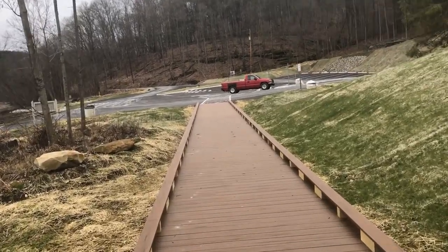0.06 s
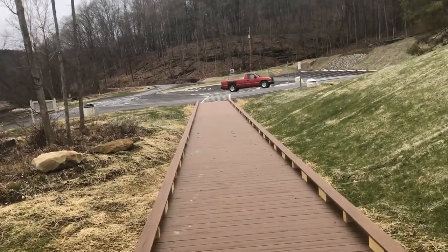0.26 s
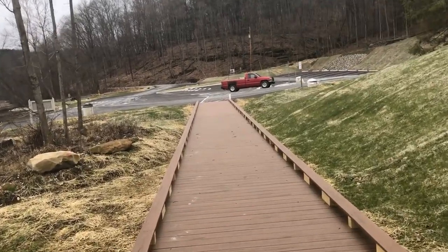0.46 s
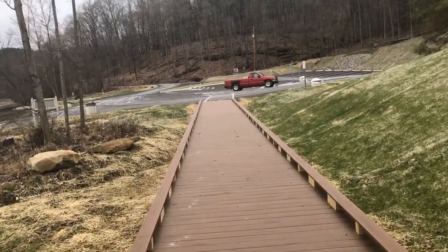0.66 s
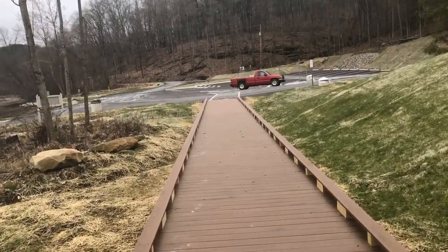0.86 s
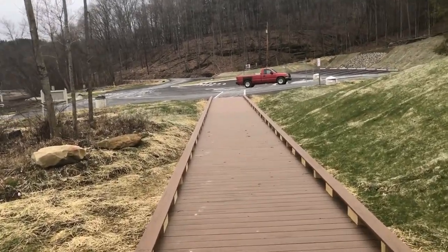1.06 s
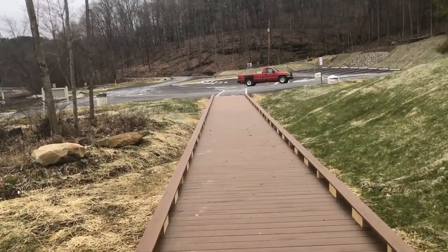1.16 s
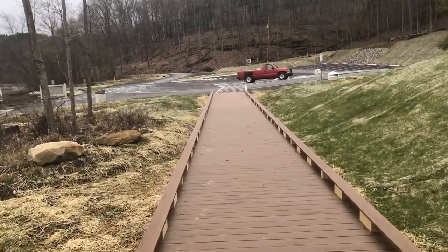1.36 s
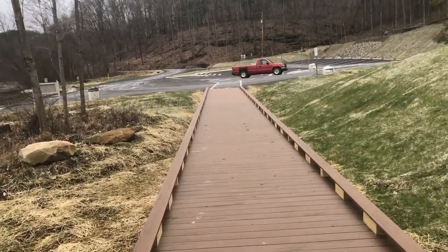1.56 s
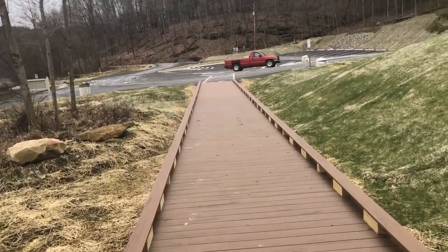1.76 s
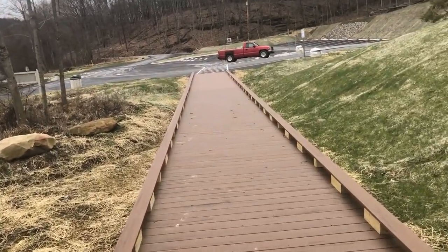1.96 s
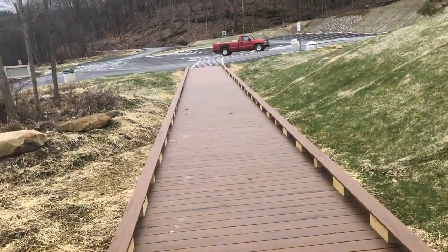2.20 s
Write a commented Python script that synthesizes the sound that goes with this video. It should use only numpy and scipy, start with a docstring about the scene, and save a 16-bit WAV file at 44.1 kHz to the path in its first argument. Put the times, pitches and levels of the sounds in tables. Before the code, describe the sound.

One walker treads a plank deck outdoors, each step a dull woody thud with rattling knocks; soles scrape and ribbed clothing swishes between steps, a sharper clack comes near the end; heard from the walker's position, no echo.

```python
"""Someone walks at an even pace along a raised boardwalk in open country, over a faint outdoor hush.
From the first step heel and sole strike the deck's modes, and planks knock as falling chirps of bending waves.
Between steps soles scuff as grainy friction noise, and ribbed clothing brushes with short zips of weave ticks.
Late on, after the last zip, one heel lands with a hard clack: a noise crack and short bright modes."""
import sys
import numpy as np
from scipy import signal
from scipy.fft import rfft, irfft
from scipy.io import wavfile

SR = 44100
rng = np.random.default_rng(int(sys.argv[2]) if len(sys.argv) > 2 else 0)


def master(y):
    """Save y as 16-bit WAV."""
    cut = np.clip(np.atleast_2d(y).T, -1, 1)
    pcm = np.round(cut * 32767)  # scale
    wavfile.write(sys.argv[1], SR, pcm.astype(np.int16))


N = 98387
T = np.arange(N) / SR
FREQS = np.maximum(np.arange(N // 2 + 1) * SR / N, 1)


def from_db(db):
    """Logarithmic level: 20 dB is a tenfold amplitude gain."""
    return 10 ** (np.asarray(db) / 20)


def rms_one(x):
    """Power normalization: scale to a mean square of one."""
    return x / np.sqrt(np.mean(x ** 2) + 1e-20)


def noise(spectrum, tilt_db=0, extra_db=0):
    """Spectral shaping: unit-power noise filtered to a spectrum, tilted by dB per octave."""
    hz, db = np.transpose(spectrum)
    octaves = np.log2(FREQS / hz[0])
    shape_db = np.interp(np.log(FREQS), np.log(hz), db) + tilt_db * octaves + extra_db
    skirt = np.minimum(FREQS / hz[0], 1) ** 4  # steep fall below the first frequency
    white = rfft(rng.standard_normal(N))
    return rms_one(irfft(white * from_db(shape_db) * skirt, N))


def flutter(rate_hz):
    """Random modulation: low-passed noise wobbles smoothly, with unit power."""
    white = rfft(rng.standard_normal(N))
    return rms_one(irfft(white / (1 + (FREQS / rate_hz) ** 2), N))


def decay(start, t60):
    """Exponential decay: the envelope jumps to 1 and falls 60 dB in t60 seconds."""
    elapsed = np.clip((T - start) / t60, 0, 2)
    return (T >= start) * np.exp(-np.log(1000) * elapsed)


def ring(times, gains, hz, t60):
    """Modal resonance: a damped two-pole oscillator struck by impulses at the given times."""
    clicks = np.zeros(N)
    samples = np.clip((times * SR).astype(int), 0, N - 1)
    np.add.at(clicks, samples, gains)
    radius = np.exp(-np.log(1000) / (t60 * SR))
    angle = 2 * np.pi * hz / SR
    poles = [1, -2 * radius * np.cos(angle), radius * radius]
    return signal.lfilter([0, np.sin(angle)], poles, clicks + 1e-18)


# Heel, sole and weight coming down on the deck.
# Each row: start in seconds, relative level in dB, bass in dB, treble in dB.
FOOTFALLS = [(0.001, -37.5, -36, -8.5), (0.074, -47.5, -19, 11), (0.088, -55, -10, 12),
             (0.134, -60.5, 9, -8), (0.188, -56.5, -2, 2), (0.594, -50, 9.5, -1), (0.623, -46, -23, -10),
             (0.656, -57, -3, 8.5), (0.724, -61, 14, -31), (0.834, -54.5, -2, -3), (0.995, -63, -1, 11),
             (1.171, -57, -6, 2), (1.231, -45.5, -8, 4.5), (1.263, -43.5, -6, -5.5), (1.292, -54.5, -4, -6),
             (1.328, -56.5, 11, -13), (1.454, -60, -12, 3.5), (1.768, -47, 13, -0.5),
             (1.815, -46.5, -17, 10), (1.838, -49, -4, 2.5), (1.861, -47, -13, 5), (1.924, -51, -12, 4.5),
             (2.044, -55, -16, 5.5)]
# Modes of the deck on its joists. Each row: frequency in Hz, relative level in dB, t60 in seconds.
DECK_MODES = [(44, -21.5, 0.19), (78.5, -9, 0.48), (118.1, -3, 0.42), (139, -24, 0.087), (155.4, -2, 0.21),
              (192.3, 4.5, 0.19), (241.3, -3, 0.15), (257, -14, 0.11), (311.3, -2.5, 0.13),
              (334.4, -13.5, 0.29), (393, -16.5, 0.14), (449, -19, 0.15), (601, -39, 0.11),
              (692, -15, 0.077), (920, -23, 0.06)]
BASS_HZ, BODY_HZ, TREBLE_HZ = 80.5, 186, 319
MODE_SCATTER_DB = 0.6
DECK_TRAVEL_S = 0.0029  # at the body pitch; lower modes arrive later


def deck_modes():
    """Modal excitation: each footfall rings the deck in a balance that depends on the spot."""
    start, db, bass_db, treble_db = np.transpose(FOOTFALLS)
    scatter_db = MODE_SCATTER_DB * rng.standard_normal((len(start), len(DECK_MODES)))
    out = np.zeros(N)
    for k, (hz, mode_db, t60) in enumerate(DECK_MODES):
        low = np.interp(hz, [BASS_HZ, BODY_HZ], [1, 0])
        high = np.interp(hz, [BODY_HZ, TREBLE_HZ], [0, 1])
        gains = from_db(db + mode_db + low * bass_db + high * treble_db + scatter_db[:, k])
        arrival = start + DECK_TRAVEL_S * (np.sqrt(BODY_HZ / hz) - 1)
        sign = (-1) ** (k // 2)  # polarity flips every two modes
        out += sign * ring(arrival, gains, hz, t60)
    return out


# The rest of the structure. Each row: frequency in Hz, relative spectral level in dB per Hz.
RUMBLE = [(25, -3), (45, -15), (80, -9.5), (160, 6.5), (300, -16.5), (500, -18.5), (900, -28),
          (1600, -25.5), (4000, -51)]
RUMBLE_DB, RUMBLE_T60_S, RUMBLE_RISE_S = -4.5, 0.5, 0.0086


def deck_rumble():
    """Diffuse decay: the structure rumbles on as noise, the powers of the footfalls adding."""
    power = np.zeros(N)
    for start, db, _, _ in FOOTFALLS:
        rise = np.clip((T - start) / RUMBLE_RISE_S, 0, 1)
        power += (from_db(db) * decay(start, RUMBLE_T60_S) * rise) ** 2
    return from_db(RUMBLE_DB) * np.sqrt(power) * noise(RUMBLE)


# Planks knocking on their joists. Each row: start in seconds, relative level in dB,
# brightness in dB per octave, travel time at 1 kHz in seconds.
KNOCKS = [(0.0683, -45, -7, .0036), (0.0845, -44, 7, .003), (0.118, -48, 5, .003),
          (0.146, -44, -11, 0.0039), (0.27, -43.5, -6.5, 0.0022), (0.291, -44, -7, .003),
          (0.361, -44.5, -3, 0.0033), (0.372, -41, -5, .0045), (0.507, -57, 13, .003),
          (0.592, -55, -3, 0.0042), (0.619, -38.5, -8, .003), (0.666, -45.5, -2.5, .003),
          (0.811, -42.5, -9, .003), (0.922, -45.5, -2, 0.0027), (0.998, -43, -1, .003),
          (1.018, -42, -7.5, .003), (1.053, -41.5, -9, .0036), (1.129, -44, -3.5, .003),
          (1.228, -41.5, -7.5, .003), (1.262, -50, -1, .003), (1.305, -50, -10, .003),
          (1.347, -45.5, -8, .003), (1.381, -43.5, -9.5, 0.0035), (1.451, -44, -3, 0.00341),
          (1.566, -46.5, 2.5, .003), (1.659, -37, -1, .003), (1.665, -42.5, -12.5, .0036),
          (1.767, -43.5, 3, 0.0034), (1.781, -40.5, 2, .0035), (1.799, -38.5, -2, .003),
          (1.813, -37.5, 1, .003), (1.868, -41.5, 1.5, .003), (1.911, -44, 3, .003),
          (2.050, -38.5, -4.5, .003), (2.172, -40, 1, .003)]
KNOCK_HZ, KNOCK_OCTAVES, KNOCK_DB = 530, 1.015, -3  # centre, width, level
KNOCK_ECHO_DB, KNOCK_ECHO_PATH = -9, 2.1  # back from the plank's end; length against the direct path


def knock_chirps():
    """Bending-wave dispersion: highs travel faster, so each knock is a quick falling chirp."""
    out = np.zeros(N)
    hz = np.maximum(np.arange(2049) * SR / 4096, 1)
    octave = np.log2(hz / KNOCK_HZ)
    for s, db, tilt_db, travel in KNOCKS:
        shape = np.exp(-.5 * (octave / KNOCK_OCTAVES) ** 2) * from_db(tilt_db * octave)
        lag = 4 * np.pi * travel * np.sqrt(1000 * hz)  # phase; delay goes as 1 / sqrt(Hz)
        direct = np.exp(-1j * lag)
        echo = from_db(KNOCK_ECHO_DB) * np.exp(-1j * lag * KNOCK_ECHO_PATH)
        wave = irfft(shape * (direct + echo))
        wave = wave[:len(wave) // 2]
        knock = from_db(db + KNOCK_DB) * wave / np.abs(wave).max()
        start = int(s * SR)
        out[start:start + len(wave)] += knock[:N - start]
    return out


# Modes of a single plank. Each row: frequency in Hz, relative level in dB, t60 in seconds.
PLANK_MODES = [(254.5, -13, 0.2), (311, -7, 0.081), (397, -10, 0.084), (464, -6, 0.075), (617, 3.5, 0.11),
               (715.6, 2, 0.15), (790, -6, .1), (909, 0, .16), (1049, 0.5, 0.11), (1453, -2.5, 0.21),
               (1820, -5, 0.15)]
PLANK_MODES_DB = -25.52


def plank_modes():
    """Modal excitation: the dispersed knock reaches each mode of the plank at its own time."""
    start, db, tilt_db, travel = np.transpose(KNOCKS)
    out = np.zeros(N)
    for hz, mode_db, t60 in PLANK_MODES:
        arrival = start + travel * np.sqrt(1000 / hz)
        gains = from_db(db + PLANK_MODES_DB + mode_db + tilt_db * np.log2(hz / KNOCK_HZ))
        out += ring(arrival, gains, hz, t60)
    return out


# Spectrum of rattle and ring. Each row: frequency in Hz, relative spectral level in dB per Hz.
PLANK_NOISE = [(120, -14), (250, 16), (500, 12.5), (750, -2), (1400, -30), (3000, -10), (8000, -23)]
KNOCK_RING_DB, KNOCK_T60_S = -21, 0.17
RATTLE_DB, RATTLE_T60_S = -16.5, 0.024


def plank_rattle():
    """Two-rate decay: after each knock a noise dies first as a quick rattle, then as a longer ring."""
    power = np.zeros(N)
    for start, db, _, travel in KNOCKS:
        tail = from_db(db + KNOCK_RING_DB) * decay(start + travel, KNOCK_T60_S)
        rattle = from_db(db + RATTLE_DB) * decay(start + travel, RATTLE_T60_S)
        power += (tail + rattle) ** 2
    return np.sqrt(power) * noise(PLANK_NOISE)


# A hard heel edge strikes and chatters. Each row: start in seconds, relative level in dB.
CLACKS = [(1.7633, -48), (1.7644, -39), (1.7655, -39), (1.7675, -45), (1.7689, -39), (1.7795, -51),
          (1.7905, -56), (1.8005, -57), (1.8155, -62), (1.8165, -62)]
# Heel and plank surface. Each row: frequency in Hz, relative level in dB, t60 in seconds.
HEEL_MODES = [(737, -9.5, 0.13), (780, -0.5, 0.056), (883, -12.5, 0.083), (2160, -28, .025),
              (2200, -13.5, 0.022), (2955, 3, 0.013), (3240, -16, 0.017), (4250, -16, .016),
              (5450, -10, .014), (7020, -19, 0.027), (6970, -18, .022), (7300, -15.5, 0.026),
              (8800, -15, .022)]
HEEL_DB = -1
HEEL_SOFT_HZ = 9500  # low-pass: the contact is not quite sharp


def heel_modes():
    """Impact excitation: hard contacts ring short bright modes, limited by the contact's sharpness."""
    start, db = np.transpose(CLACKS)
    modes = sum(ring(start, from_db(db + mode_db), hz, t60) for hz, mode_db, t60 in HEEL_MODES)
    softening = signal.butter(4, HEEL_SOFT_HZ, fs=SR, output="sos")
    return from_db(HEEL_DB) * signal.sosfilt(softening, modes)


# Spectrum of the crack. Each row: frequency in Hz, relative spectral level in dB per Hz.
CRACK = [(500, -4.5), (1500, -8.5), (2400, 5.5), (5000, -0.5), (8500, -7.5), (11000, -21.5), (13000, -31),
         (16000, -37)]
CRACK_DB, CRACK_T60_S = -1, .018


def heel_crack():
    """Broadband impact: each hard contact releases a gritty burst of decaying noise."""
    envelope = sum(from_db(db) * decay(start, CRACK_T60_S) for start, db in CLACKS)
    return from_db(CRACK_DB) * noise(CRACK) * envelope


GRIT_PER_S, GRIT_SPREAD_DB = 590, 5
GRIT_LOW_HZ, GRIT_HIGH_HZ = 2180, 9050


def grit():
    """Random impulse train: sand grains snap under a sole as sparse bright clicks of unit power."""
    snaps = rng.random(N) < GRIT_PER_S / SR
    polarity = rng.choice([-1, 1], N)
    sizes = from_db(GRIT_SPREAD_DB * np.clip(rng.standard_normal(N), -2, 2))
    band = signal.butter(2, [GRIT_LOW_HZ, GRIT_HIGH_HZ], "band", fs=SR, output="sos")
    return rms_one(signal.sosfilt(band, snaps * polarity * sizes))


# Soles and cloth rubbing. Each row: peak time in seconds, rise in seconds, fall in seconds,
# relative level in dB, brightness in dB per octave, rasp frequency in Hz.
SCUFFS = [(0.03, 0.098, 0.038, -63.5, 2.5, 5970), (0.098, .035, .035, -59.5, 0, 3460),
          (0.20, .04, 0.13, -65, -0.5, 1730), (0.369, 0.028, 0.017, -57.5, 0.5, 2080),
          (0.68, .04, 0.091, -66, -1.5, 870), (0.905, 0.046, 0.057, -60, -3, 1550),
          (1.008, 0.013, 0.013, -56.5, 0, 2840), (1.016, 0.018, 0.0079, -58, -2, 5540),
          (1.131, 0.0065, 0.0097, -56, 0.5, 700), (1.305, 0.006, .005, -52, 0.5, 4600),
          (1.346, 0.047, 0.039, -61.5, 3.5, 3560), (1.52, 0.025, .04, -64.5, 1.5, 1820),
          (1.657, 0.021, 0.015, -51.5, -1, 2340), (1.787, 0.013, 0.037, -59, 5, 8850),
          (1.856, 0.0098, 0.011, -55, -1, 1510), (1.925, 0.0084, .015, -67, 8, 900),
          (2.145, 0.042, 0.036, -60.5, 1, 1180)]
# Spectrum of the rubbing. Each row: frequency in Hz, relative spectral level in dB per Hz.
RUB = [(200, -25), (700, 5), (1200, 1.5), (1900, 0.5), (3200, -2.5), (5500, -9), (9000, -20), (16000, -24)]
RUB_GRAIN_DB, RUB_GRAIN_HZ = 2.5, 184  # depth and rate of the flutter
RASP_DB, RASP_OCTAVES = 7, 0.25  # height and half-width of the resonance
GRIT_DB = -17


def scuffs():
    """Stick-slip friction: grainy noise swells with each stroke, with its own rasp; bright ones crunch."""
    out = np.zeros(N)
    grain = rms_one(from_db(RUB_GRAIN_DB * flutter(RUB_GRAIN_HZ)))
    sand = grit()
    for peak, rise, fall, db, tilt_db, hz in SCUFFS:
        width = np.where(T < peak, rise, fall)
        swell = np.exp(-.5 * np.minimum(np.abs(T - peak) / width, 10) ** 2)
        rasp_db = RASP_DB / (1 + (np.log2(FREQS / hz) / RASP_OCTAVES) ** 2)
        rub = grain * noise(RUB, tilt_db, rasp_db)
        crunch = from_db(GRIT_DB + 2 * tilt_db) * sand
        out += from_db(db) * swell * (rub + crunch)
    return out


# Ribbed cloth sliding on cloth, its pitch following the speed; one list a stroke.
# Each row: time in seconds, frequency in Hz, level in dB, roughness (held within 0-1).
ZIPS = [
    [(0.320, 1450, -62, 0.49), (0.332, 1900, -63, 0.52), (0.336, 1990, -44.5, .03),
     (0.348, 2016, -57.5, 0.14), (0.356, 2056, -56, 0.2), (0.366, 2100, -62.5, 1)],
    [(0.835, 2300, -68, .8), (0.885, 2450, -66, 0.27), (0.912, 2350, -70, 1.1), (0.93, 1727, -65, 0.77),
     (0.95, 1600, -73, 0.75)],
    [(1.592, 1464, -68, 0.74), (1.618, 1559, -58.5, .6), (1.621, 1680, -52, .15),
     (1.630, 1795, -54.5, 0.43), (1.641, 2186, -62, 1.2), (1.650, 1979, -54.5, 0.8),
     (1.672, 2550, -68, 1.1)],
]
ZIP_JITTER = .2  # share of the speed, at full roughness
ZIP_OCTAVE_DB, ZIP_FLUTTER_DB = -16, 4


def zips():
    """Periodic excitation: weave ticks fuse into a tone with a weak octave; uneven sliding makes it rasp."""
    out = np.zeros(N)
    for stroke in ZIPS:
        s, hz, db, rough = np.transpose(stroke)
        roughness = np.interp(T, s, np.clip(rough, 0, 1))
        speed = 1 + ZIP_JITTER * roughness * flutter(718)
        phase = 2 * np.pi * np.cumsum(np.interp(T, s, hz) * speed) / SR
        sliding = (T > s[0]) * (T < s[-1])
        level = from_db(np.interp(T, s, db) + ZIP_FLUTTER_DB * flutter(200)) * sliding
        tone = np.sin(phase) + from_db(ZIP_OCTAVE_DB) * np.sin(2 * phase)
        out += level * rms_one(tone)
    return out


# The clothing's faint rustle, which drops between strides. Each row: time in seconds, level in dB.
RUSTLE_LEVEL = [(0, -64.5), (0.27, -66), (0.43, -74), (0.58, -79), (0.68, -64.5), (0.8, -70.5), (0.96, -70),
                (1.06, -66), (1.2, -66), (1.37, -64), (1.43, -82), (1.5, -67.5), (1.63, -66), (1.72, -77),
                (1.85, -70), (2.0, -67.5), (2.12, -70.5), (2.23, -73)]
# Spectrum of the rustle. Each row: frequency in Hz, relative spectral level in dB per Hz.
RUSTLE = [(500, -7), (900, -0.5), (1700, 1), (3500, -3), (8000, -10.5), (16000, -17)]


def clothing():
    """Amplitude modulation: a faint rustle of noise comes and goes as the walker moves."""
    s, db = np.transpose(RUSTLE_LEVEL)
    return from_db(np.interp(T, s, db)) * noise(RUSTLE)


# The low rumble under the steps. Each row: time in seconds, level in dB.
LOW_SWELL = [(0, -81), (0.25, -57), (0.33, -77), (0.55, -73), (0.75, -57), (0.95, -84), (1.15, -81),
             (1.38, -49.5), (1.5, -71), (1.7, -60), (1.93, -50), (2.12, -58.5), (2.23, -65)]
# Spectrum of the low rumble. Each row: frequency in Hz, relative spectral level in dB per Hz.
LOW_SPECTRUM = [(36, -6), (48, -2.5), (78, 1.5), (110, -11), (200, -20), (800, -54)]


def low_rumble():
    """Amplitude modulation: a low noise slowly swells and sinks."""
    s, db = np.transpose(LOW_SWELL)
    return from_db(np.interp(T, s, db)) * noise(LOW_SPECTRUM)


# Spectrum of the outdoor hush. Each row: frequency in Hz, relative spectral level in dB per Hz.
HUSH = [(30, -7), (45, 3.5), (96, -3), (161, 0), (216, -1.5), (299, -2.5), (604, -9.5), (955, -11),
        (1180, -17), (1470, -13.5), (2890, -22), (3990, -20), (5090, -23.5), (10000, -29), (15800, -31.5)]
HUSH_DB = -58


def hush():
    """Stationary noise: the open air keeps a steady level and spectrum."""
    return from_db(HUSH_DB) * noise(HUSH)


def scene():
    """Superposition: the walker in the open air, with no walls to answer."""
    steps = deck_modes() + deck_rumble() + heel_modes() + heel_crack()
    knocks = knock_chirps() + plank_modes() + plank_rattle()
    rubbing = scuffs() + zips() + clothing()
    return (steps + knocks + rubbing + low_rumble() + hush())[None]


CUTOFF_HZ = 15900


def record(dry):
    """Band limiting: every frequency from the cutoff up is removed."""
    hz = np.arange(N + 1) * SR / (2 * N)
    return irfft(rfft(dry, 2 * N) * (hz < CUTOFF_HZ), 2 * N)[:, :N]


dry = scene()
out = record(dry)
master(out)
```